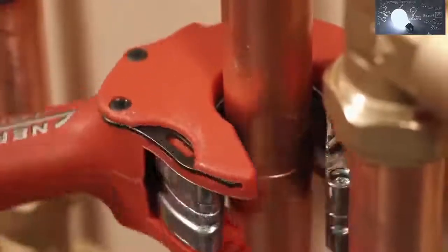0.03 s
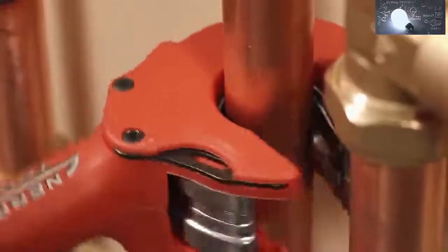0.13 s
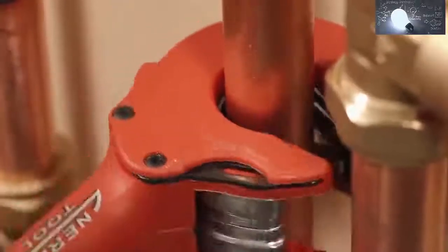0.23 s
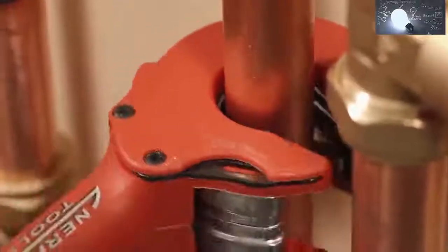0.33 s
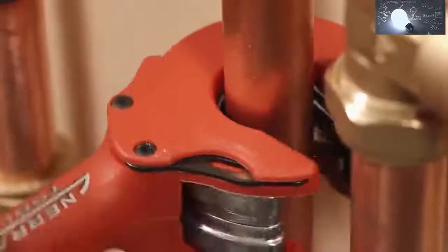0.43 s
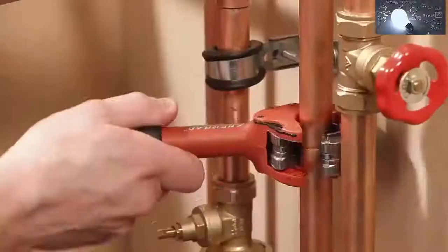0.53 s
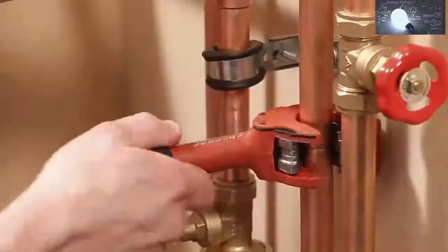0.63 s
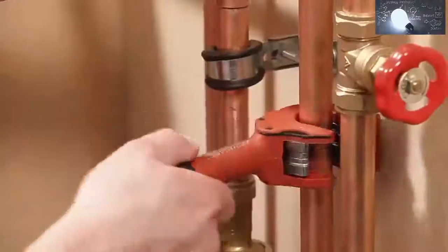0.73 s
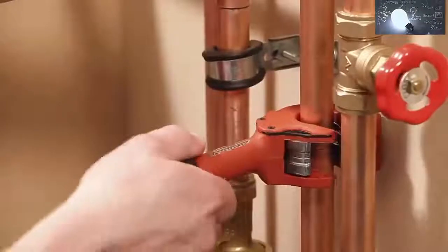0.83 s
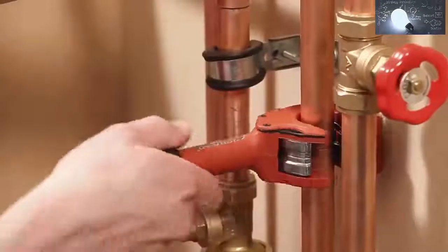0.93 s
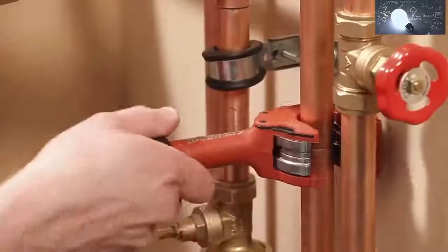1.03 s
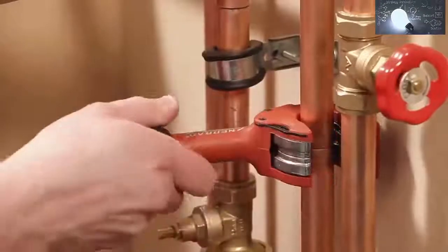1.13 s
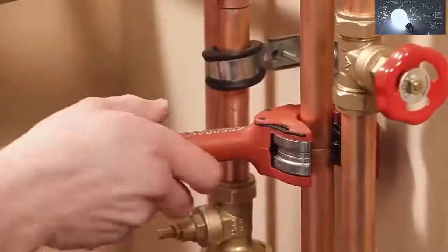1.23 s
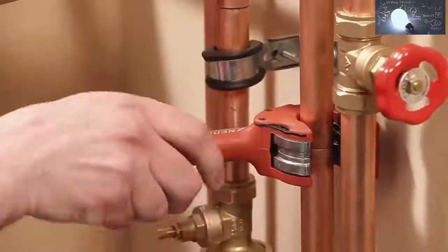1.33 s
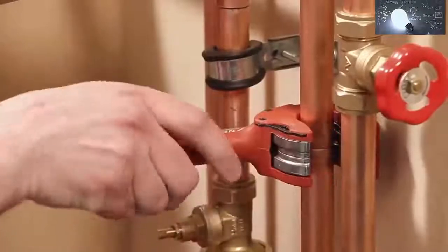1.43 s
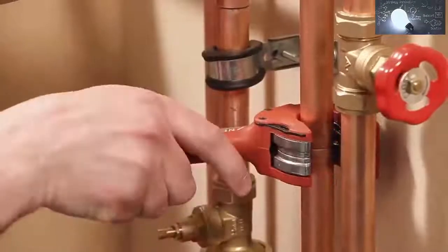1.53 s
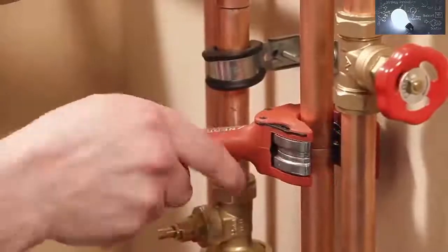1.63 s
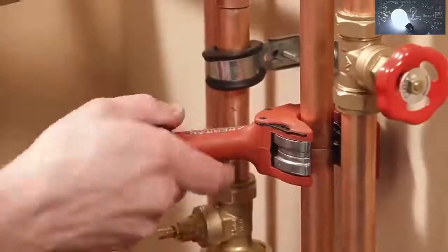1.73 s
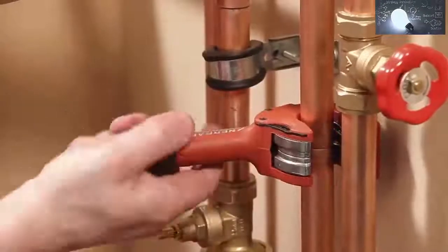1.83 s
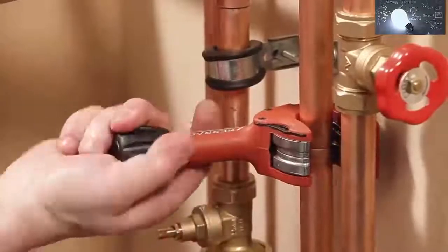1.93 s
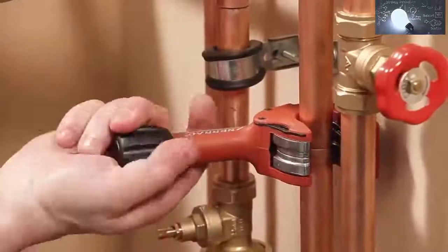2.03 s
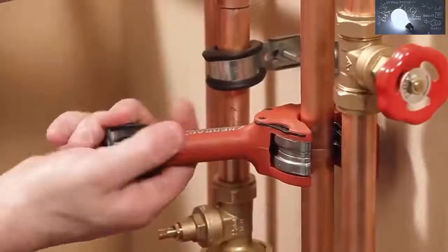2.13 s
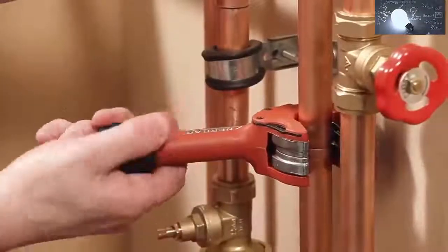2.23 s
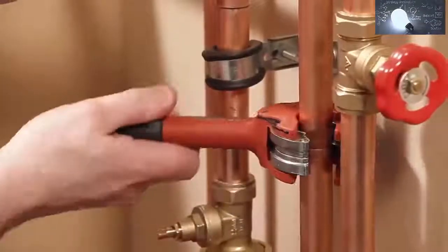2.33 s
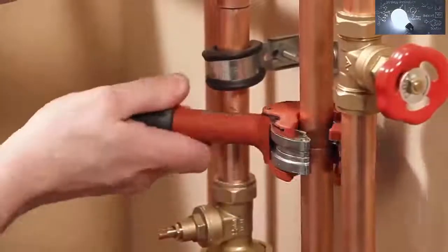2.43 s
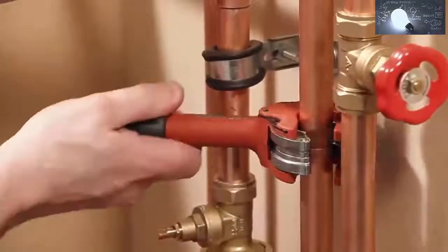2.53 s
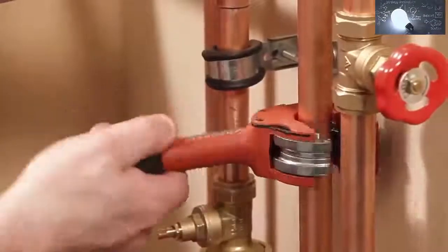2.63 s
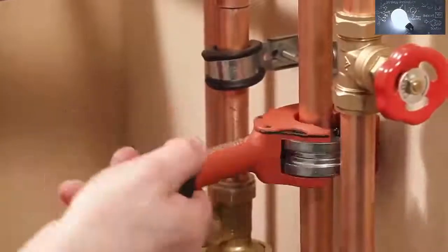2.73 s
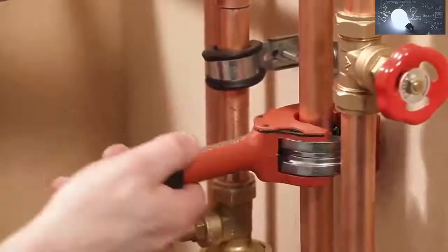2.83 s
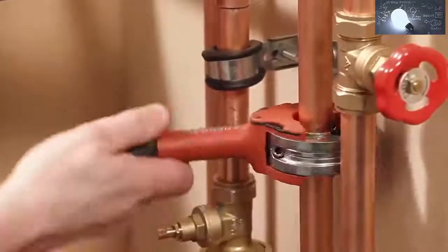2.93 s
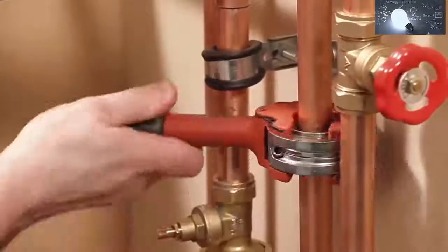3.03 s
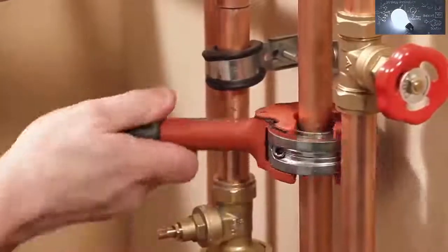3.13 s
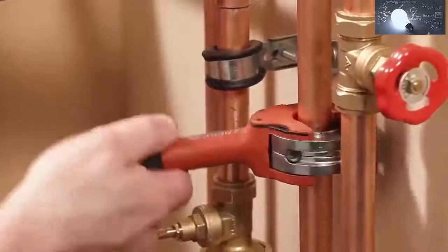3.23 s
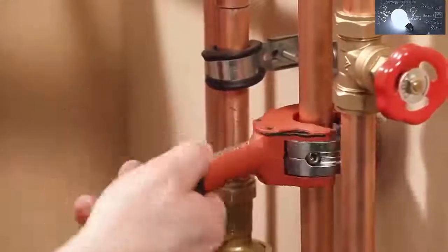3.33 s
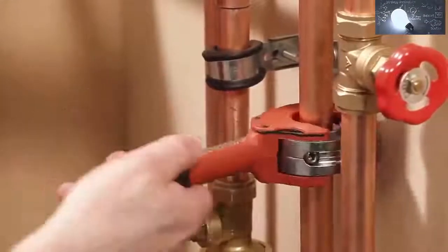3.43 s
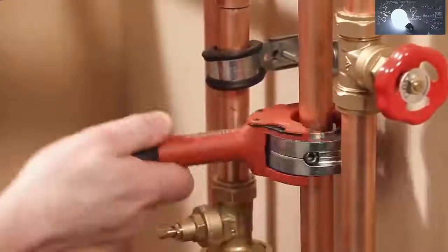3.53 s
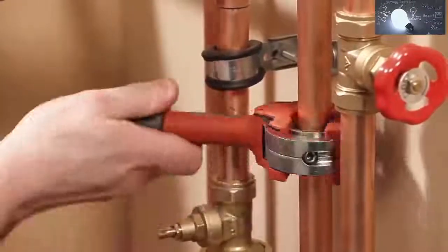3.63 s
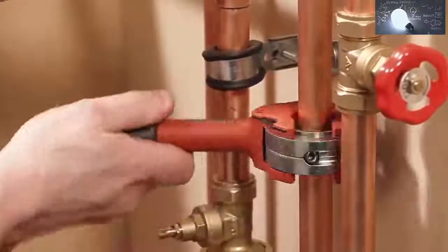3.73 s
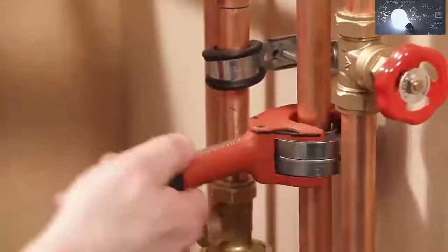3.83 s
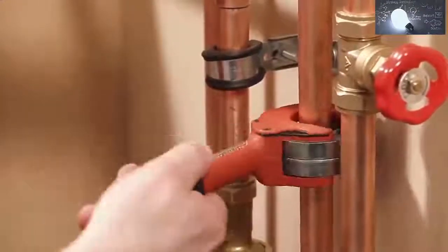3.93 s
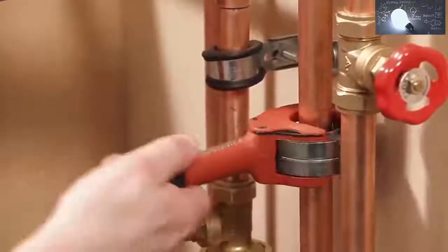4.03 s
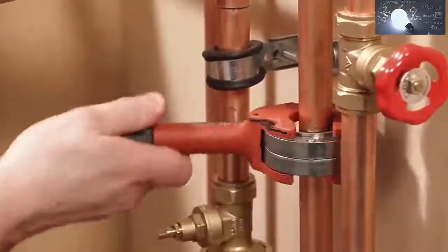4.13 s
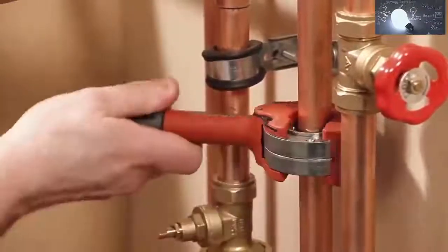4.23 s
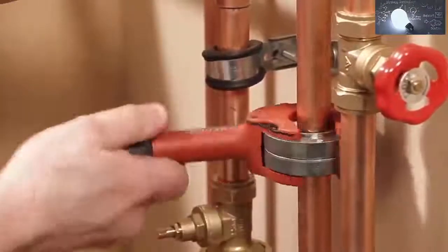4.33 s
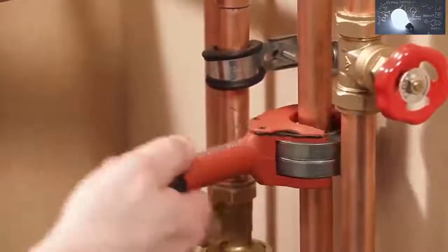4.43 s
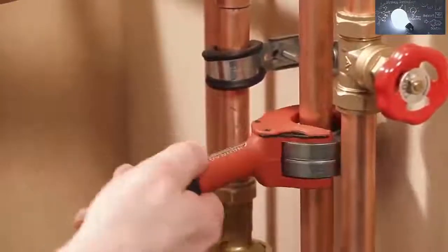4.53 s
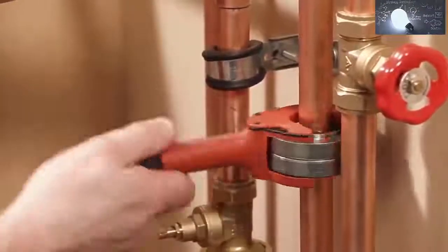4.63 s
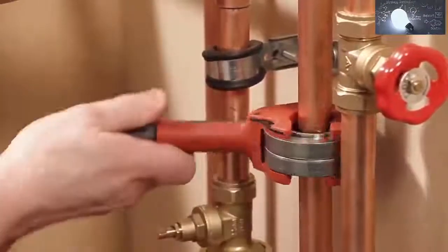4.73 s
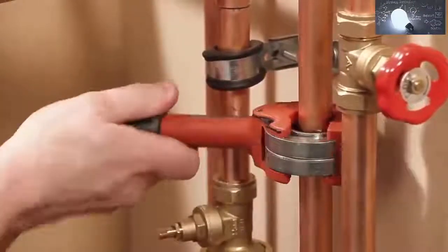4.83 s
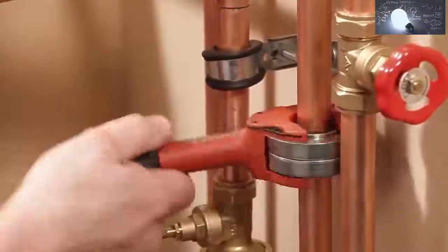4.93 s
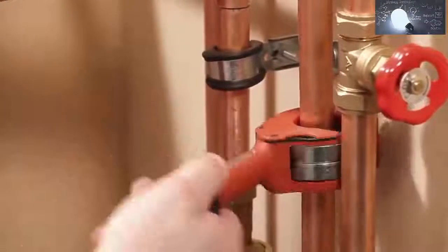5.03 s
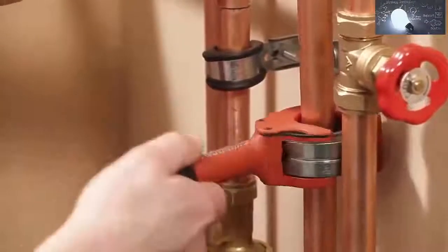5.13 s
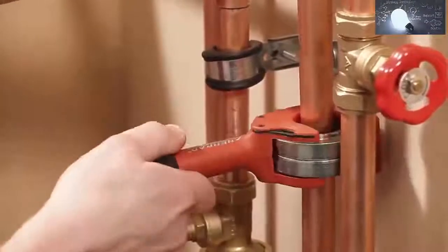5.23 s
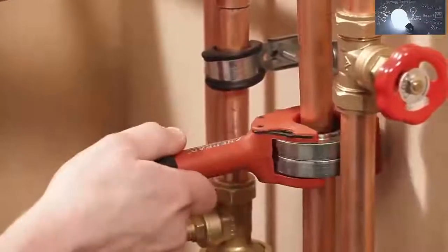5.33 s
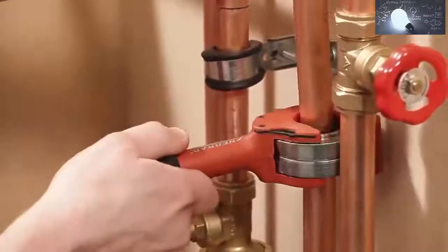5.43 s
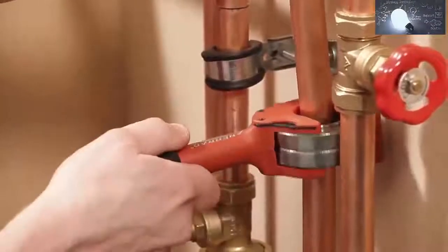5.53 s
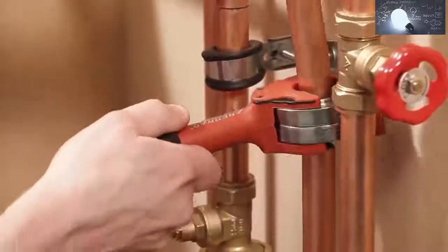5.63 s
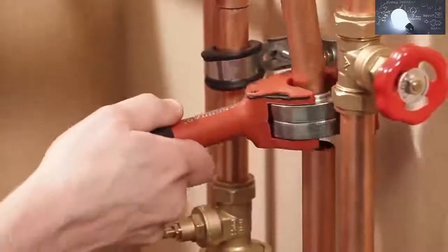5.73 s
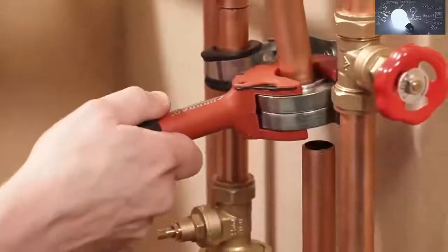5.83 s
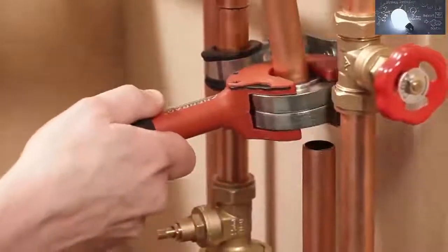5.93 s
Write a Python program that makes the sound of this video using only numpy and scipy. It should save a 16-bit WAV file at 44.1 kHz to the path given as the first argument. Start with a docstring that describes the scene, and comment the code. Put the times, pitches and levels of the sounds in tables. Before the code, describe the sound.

A hand ratchet tube cutter works on copper pipe in a bare, echoing room, heard close up over a very faint low hush. The tail of an earlier click opens the sound, with a soft tick at 0.1 s. Faint knocks from 0.36 s lead to a light, rapid cluster of clicks at 0.6-0.7 s. Firmer metallic clacks fall between 0.97 and 1.46 s, with a sharp knock at 1.19. Then it is almost quiet, with a faint rub near 1.8-2.0 s. Small grip knocks begin at 2.23, and strong ratchet bursts follow at 2.43-2.53, 3.0-3.19, 3.62-3.76, 4.2-4.32 and 4.78-4.89 s, bright, dry and uneven. Single handle knocks land between them around 3.87, 4.46, 4.7 and 5.02. A hard, crisp clack comes at 5.13 s, then the echo fades, with a light knock at 5.27 and small soft knocks at 5.55-5.8 s. Pipework booms very faintly beneath.

```python
"""In a bare, echoing room a ratchet tube cutter is fitted on a copper pipe and swung to and fro.
The pawl snaps over the teeth and the handle knocks at the stroke ends: bursts of noise strike
damped sine modes. Hand and rollers rub now and then, as level-shaped grains of coloured noise.
The pipework booms faintly, as noise through two low resonances, over a low hush of coloured noise."""
import sys
import numpy as np
from scipy import signal
from scipy.fft import rfft, irfft
from scipy.io import wavfile

SR = 44100
rng = np.random.default_rng(int(sys.argv[2]) if len(sys.argv) > 2 else 0)


def store_pcm(level_fs):
    """Save levels as 16-bit WAV."""
    pcm = np.round(np.clip(level_fs, -1, 1) * 32767).astype(np.int16)
    wavfile.write(sys.argv[1], SR, np.atleast_2d(pcm).T)


N = 264159
LEAD = SR // 4      # samples of sound made ahead of the start, so that its echo is already there
EARLIER_S = -0.1    # time of a blow ahead of the start, seconds


def blows():
    """A first touch and a few ms of chatter strike every mode; the part struck sets the balance."""
    # Modes of pipework, cutter body and pawl. Each row: pitch in Hz, level in dB, t60 in seconds.
    modes = [(207.6, -13, 0.047), (274, -11, 0.13), (327, -8, 0.056), (428.5, -1.5, 0.078),
             (529, -3, 0.049), (640.7, -4.5, 0.052), (944, 3, 0.02), (1104, -8, 0.081), (1155, -14, 0.15),
             (1279, 0.5, 0.049), (1435, -3.5, 0.072), (1497, 8, 0.0051), (1662, 6, 0.023), (1780, 0, 0.044),
             (1999, 1, 0.021), (2182, 1, 0.036), (2503, 7.5, 0.005), (2810, 1.5, 0.017),
             (3125, 13.5, 0.003), (3334, 8, 0.0072), (3436, -2.5, 0.029), (3797, 7.5, 0.0058),
             (4345, -3, 0.0048), (4610, 11.5, 0.00094), (5650, -7, 0.006), (5680, -0.5, 0.0019),
             (8660, -3, 0.00086), (9040, -18.5, 0.0012), (11500, -25, 0.00083), (13400, -32, 0.0018)]
    # Four parts: pipework, handle, head and pawl. Columns: loudness in dB for equal blows.
    part_levels = (1.5, -7.5, -7.5, 3.5)
    # Same four parts. Columns: energy of the first sharp touch in dB relative to the chatter.
    first_touch = (-11, -9, -3.5, -2)
    # Same four parts. Columns: chatter length factor; heavy parts shake longest, the pawl shortest.
    stretches = (4.57, 1.6, 1.01, 0.68)
    pipe_top_hz, handle_top_hz, pawl_bottom_hz = 800, 1900, 4500
    handle_hz, head_hz = 1313, 2740     # the handle's share of a body mode fades from one to the other
    pawl_share = 0.11                   # share of the pawl level per octave above head_hz
    favour_octaves = 0.09               # where a blow lands decides which modes ring most
    scatter_db = 2.0                    # chance spread of mode strengths from blow to blow
    detune = 0.018                      # grip and position put a blow's modes down, level or up

    s, head_db, handle_db, pipe_db, pawl_db, length_ms, favoured_hz, second_hz, favour_db = (
        np.transpose(all_blows()))
    favourites = np.array([favoured_hz, second_hz])
    contacts = [chatter(length_ms * stretch) for stretch in stretches]
    scatter = rng.standard_normal((len(s), len(modes)))
    signs = (-1) ** np.arange(len(modes))      # neighbouring modes swing against each other
    shifts = rng.integers(0, 3, len(s))
    at = LEAD + np.round(s * SR).astype(int)
    parts = np.zeros((len(part_levels), LEAD + N))

    for (hz, mode_db, t60), chance, sign in zip(modes, scatter.T, signs):
        part = (hz > pipe_top_hz) + (hz > handle_top_hz) + (hz > pawl_bottom_hz)
        handle_share = np.clip(np.log(head_hz / hz) / np.log(head_hz / handle_hz), 0, 1)
        body_db = handle_db * handle_share
        body_db += pawl_db * pawl_share * max(np.log2(hz / head_hz), 0)
        struck_db = (pipe_db, body_db, body_db, pawl_db)[part]
        distance = np.log2(hz / favourites) / favour_octaves
        lift_db = favour_db * np.exp(-np.square(distance)).max(axis=0)
        level_db = head_db + part_levels[part] + mode_db + struck_db + scatter_db * chance + lift_db
        size = sign * from_db(level_db)

        force = np.zeros((3, LEAD + N))     # one row for each tuning
        force[shifts, at] = size * from_db(first_touch[part])
        for shift, start, gain, burst in zip(shifts, at, size, contacts[part]):
            force[shift, start:start + len(burst)] += gain * burst
        parts[part] += sum(ring(force[k], hz * (1 + detune * (k - 1)), t60) for k in range(3))

    # small parts radiate no bass, soft contacts no treble
    pipework = band(parts[0], 170, 880)
    body = band(parts[1] + parts[2], 533, 5300)
    pawl = band(parts[3], 3200, 12600)
    return pipework + body + pawl


def all_blows():
    """Rows of every blow: pawl snaps, their rebounds, handle knocks; columns as for the earlier blow."""
    # The pawl snaps over a tooth. Each row: start in seconds, head strength in dB,
    # pawl level in dB relative to the head, favoured mode in Hz, chatter in ms before stretching.
    snap_rows = [(0.0924, -31.5, -15.5, 2680, 1.36), (0.4407, -41.5, -16, 4260, 0.79),
                 (0.479, -50.5, -0.5, 6370, 1.1), (0.518, -43, -3, 7740, 0.77),
                 (0.579, -36.5, -5, 3330, 1.3), (0.6101, -32, -2, 8000, .7), (0.6278, -34.5, -5, 6000, 0.4),
                 (0.6756, -32.5, -9, 4340, 1), (0.6899, -36, -1.5, 6100, 0.5),
                 (1.0849, -26.5, -6.5, 2170, 2), (1.139, -27.5, -8, 2200, 2.3),
                 (1.1428, -28, -20, 2190, 0.91), (1.1567, -25.5, -8, 3550, 1.5),
                 (1.255, -39, -2.5, 3775, 3), (1.2774, -27.5, -15, 2350, 3),
                 (1.3365, -25.5, -8.5, 3700, 1.2), (1.461, -33, -10, 3800, 1.17),
                 (2.0213, -49.5, -14, 3775, 1.9), (2.4296, -25, -14.5, 2460, 3.8),
                 (2.4411, -25, -6, 3600, 1.43), (2.4915, -22.5, -8.5, 3775, 2.1),
                 (2.531, -21, -22, 2600, 4.8), (3.001, -22, -8.5, 4300, 2.1),
                 (3.0393, -19.5, -12, 3800, 0.97), (3.07, -24, -12, 2350, 1),
                 (3.1002, -24.5, -11, 2370, 1.2), (3.135, -25.5, -11, 3300, 0.72),
                 (3.185, -23.5, -9.5, 6300, 1.76), (3.6177, -21.5, -6.5, 3775, 3.3),
                 (3.625, -20, -8.5, 3240, 1.34), (3.6555, -23.5, -7.5, 3640, 2.6),
                 (3.687, -24.5, -9.5, 3550, 4), (3.757, -29, -8.5, 3700, 5.5),
                 (4.2012, -19, -9.5, 2470, 2.16), (4.2306, -21, -10.5, 2400, 1.7),
                 (4.319, -23.5, -12.5, 3800, 4), (4.7777, -18, -11, 3930, 2.1),
                 (4.804, -21, -11.5, 2180, 2.7), (4.8307, -25.5, -8, 2400, 2.6),
                 (4.8596, -27, -7, 3700, 2.1), (4.894, -23.5, -12.5, 2100, 1.04),
                 (5.1256, -19, -7.5, 13200, 1)]
    # The handle knocks, takes up slack or is gripped. Each row: start in seconds, head strength in dB,
    # handle and pipework in dB relative to the head, two favoured modes in Hz,
    # chatter in ms before stretching.
    knock_rows = [(0.3602, -44.5, 9.5, 1, 284, 607, 2.37), (0.45, -49, -1, -22, 1670, 1400, 1.3),
                  (0.638, -36, -13, -24, 1370, 1670, 2.3), (0.7, -47.5, 3, -11, 1660, 2000, 2.6),
                  (0.9704, -29.5, -11.5, -30, 1310, 2000, 4.1), (1.1903, -29, -10, -21, 2460, 3180, 1.2),
                  (1.1927, -17, -11.5, -23, 1703, 2800, 1.2), (1.4530, -33.5, -1.5, -13, 1120, 630, 0.98),
                  (2.231, -45, -21, -13.5, 2530, 2000, 2.8), (2.267, -36.5, -11, -24, 2630, 3250, 4.4),
                  (2.293, -38.5, 2, -7, 1270, 996, 2.25), (2.3131, -33.5, -7, -17, 2800, 3220, 2.1),
                  (2.499, -44.5, 10.5, -5, 1120, 1210, 1.4), (2.542, -59.5, -6, 14.5, 308, 323, 2.3),
                  (2.9544, -45, -1.5, -13, 2720, 2180, 3.2), (2.988, -36, -1, -12.5, 3430, 1272, 4.6),
                  (3.2629, -36.5, -5, -11, 3140, 2500, 1.66), (3.5407, -34, -10.5, -27, 1800, 2710, 3),
                  (3.574, -37.5, -11, -10, 1800, 2230, 4.2), (3.8676, -23, -14.5, -21.5, 1910, 1660, 3.07),
                  (4.124, -40, -1, -17.5, 1750, 2740, 3), (4.4542, -38.5, -8, -22, 1760, 2580, 2.3),
                  (4.4592, -21.5, -9, -23, 1770, 1114, 1.9), (4.7008, -27.5, -11, -23.5, 1250, 3246, 3.3),
                  (5.017, -24.5, -7.5, -19.5, 2053, 1150, 2.7), (5.1298, -17, -12, -21, 2923, 1710, 1.07),
                  (5.2659, -30.5, -29, -39, 2750, 2800, 2.2), (5.55, -53, -2.5, -9, 1910, 3220, 2.3),
                  (5.6216, -56.5, 2, -5, 2010, 2160, 3.9), (5.662, -44.5, -1, -15, 1280, 1280, 5.1),
                  (5.7286, -33.5, -10.5, -26, 1690, 1425, 1.9), (5.791, -29, -2.5, -11, 2450, 1170, 2.23)]
    # A blow ahead of the start, of which little but the echo is heard. The row: start in seconds,
    # head strength in dB, handle, pipework and pawl in dB relative to the head,
    # chatter in ms before stretching, two favoured modes in Hz, their lift in dB.
    earlier = (EARLIER_S, -25, -6, -13, -3.5, 2.3, 13000, 1707, 4.1)
    # a stronger snap shakes handle and pipework more too, though by a little less than the head
    snap_handle_db, snap_pipe_db, body_slope, mean_db = -21, -29.5, -0.23, -19
    snap_favour_db, knock_favour_db, knock_pawl_db = 5, 7, -23
    rebound_ms, rebound_db = (6, 20), -14   # the pawl bounces twice at chance moments after a snap

    snaps = []
    for s, db, pawl_db, hz, ms in snap_rows:
        lean_db = body_slope * (db - mean_db)
        snaps.append((s, db, snap_handle_db + lean_db, snap_pipe_db + lean_db,
                      pawl_db, ms, hz, hz, snap_favour_db))
    knocks = [(s, db, handle_db, pipe_db, knock_pawl_db, ms, hz, second_hz, knock_favour_db)
              for s, db, handle_db, pipe_db, hz, second_hz, ms in knock_rows]
    delays = rng.uniform(*rebound_ms, (len(snaps), 2)) / 1000
    rebounds = [(s + lag, db + rebound_db, *rest)
                for (s, db, *rest), lags in zip(snaps, delays) for lag in lags]
    return [earlier] + snaps + knocks + rebounds


def chatter(length_ms):
    """Parts rattle in contact: a noise burst a blow swells, dies and favours no pitch; energy 1."""
    t = np.arange(SR // 12) / SR / (np.clip(length_ms, 0.3, 15)[:, None] / 1000)   # in burst lengths
    envelope = np.sqrt(t) * np.exp(-t)
    burst = rng.standard_normal(t.shape)
    for _ in range(4):      # shape in time and flatten in frequency by turns
        spread = burst[:, :100].std(axis=1, keepdims=True)
        shaped = np.tanh(burst / spread / 2) * envelope
        flat = irfft(np.exp(1j * np.angle(rfft(shaped))), t.shape[1])
        burst = flat / (envelope + 0.02)
    burst = burst * envelope
    return burst / np.sqrt(np.sum(burst ** 2, axis=1, keepdims=True))


def rubbing():
    """Hand and rollers stick and slip in dense uneven grains under the level of each stroke."""
    # Strokes of rubbing. Each row: start in seconds, length in seconds, level in dB.
    strokes = [(0.427, 0.16, -62), (1.809, 0.19, -64.5), (2.271, 0.034, -53), (3.581, 0.13, -46),
               (4.201, 0.016, -44.5), (5.665, 0.021, -52.5)]
    # Tone of the rubbing. Each row: frequency in Hz, spectrum in dB per Hz.
    tone = [(180, -33), (300, -13), (1220, -7.5), (1380, -1.5), (1740, 2), (2340, 5), (3830, -4),
            (5060, -10), (12000, -44), (15600, -79), (22000, -120)]
    grains_per_s, attack_db_per_s, release_db_per_s = 4300, 310, 412
    t = (np.arange(LEAD + N) - LEAD) / SR
    slips = rng.random(len(t)) < grains_per_s / SR
    unevenness = from_db(2.96 * rng.exponential(1, len(t)))
    grains = slips * rng.standard_normal(len(t)) * unevenness
    level = sum(swell(t, *stroke, attack_db_per_s, release_db_per_s) for stroke in strokes)
    return level * colour(grains, tone)


def room(x):
    """Direct sound plus an echo that blends steadily through four patterns, so no one colour stays."""
    turn_s = 0.31       # time from one pattern to the next
    turn = np.arange(len(x)) / SR / turn_s
    wet = 0
    for k in range(4):
        away = np.abs((turn - k + 2) % 4 - 2)       # turns away from this pattern
        share = np.cos(np.pi / 2 * np.minimum(away, 1))     # even power in sum
        wet = wet + signal.fftconvolve(x * share, echo())
    return x[LEAD:] + wet[LEAD:LEAD + N]


def echo():
    """One pattern of close wall reflections and of noise that builds up and dies band by band."""
    # Echo of the room. Each row: frequency in Hz, t60 in seconds, level in dB relative to direct energy.
    echo_bands = [(92, 0.81, -2.5), (278, 0.86, 2), (790, 0.88, 2.5), (2090, 0.64, -4.5), (3970, 0.64, 0),
                  (6600, 0.49, -2.5), (12400, 0.26, -5)]
    wall_last_s, wall_db, wall_delay_s = 0.015, -2, 0.002   # close cluster off the wall behind the pipes
    t = np.arange(SR) / SR
    wall = rng.standard_normal(SR) * np.exp(-(t / wall_last_s) ** 4) * (t > wall_delay_s)
    response = from_db(wall_db) * wall / np.sqrt(np.sum(wall ** 2))
    white = rng.standard_normal((2, SR))        # neighbouring bands take different noise
    edges = 50 * 2 ** np.arange(0, 8.6, 0.5)    # half octaves, Hz
    for k, (low, high) in enumerate(zip(edges, edges[1:])):
        hz = np.sqrt(low * high)
        build_up = 1 - np.exp(-t / wall_last_s)
        shape = from_db(-60 * t / at_hz(echo_bands, hz)) * build_up
        band_pass = signal.butter(2, [low, high], "band", fs=SR, output="sos")
        noise = signal.sosfilt(band_pass, white[k % 2])
        gain = from_db(at_hz(echo_bands, hz, axis=2))
        response += gain * noise * shape / np.sqrt(np.sum(shape ** 2))
    return response


def hum():
    """Noise through the lowest modes of the pipework, swelling with each jolt."""
    # Low modes of the pipework. Each row: pitch in Hz, width in Hz, level in dB relative to each other.
    low_modes = [(135.8, 6.9, -1.5), (156.7, 6.6, 4)]
    # Jolts to the pipework. Each row: time of the peak in seconds, level in dB.
    jolts = [(0.12, -63), (0.4, -61), (0.75, -72), (1.251, -67.5), (1.53, -62), (2.37, -68), (2.65, -56.5),
             (3.05, -65), (3.29, -60), (3.74, -56.5), (3.93, -60.5), (4.22, -66), (4.518, -64),
             (4.85, -56.5), (5.188, -53.5), (5.84, -60), (5.918, -64)]
    rise_db_per_s, fall_db_per_s, rest_db = 209, 87.5, -76.5
    rings = 0
    for hz, width, db in low_modes:
        t60 = np.log(1000) / np.pi / width
        rings = rings + from_db(db) * rms_one(ring(rng.standard_normal(N), hz, t60))
    t = np.arange(N) / SR
    level = sum(swell(t, s, 0, db, rise_db_per_s, fall_db_per_s) for s, db in jolts)
    return (from_db(rest_db) + level) * rms_one(band(rings, 31, 440))


def hush():
    """The low hush of the room: steady noise shaped by a spectrum."""
    # Tone of the hush. Each row: frequency in Hz, spectrum in dB per Hz.
    tone = [(12, -61), (20, -21), (147, 10), (357, -1.5), (525, 9), (774, -6), (940, 6), (2690, -7),
            (3760, -3), (11400, -22), (15000, -38)]
    level_db = -69
    return from_db(level_db) * colour(rng.standard_normal(N), tone)


def ring(clicks, hz, t60):
    """A damped resonator: a unit click sets a sine of height 1 ringing."""
    r, w = from_db(-60 / (t60 * SR)), 2 * np.pi * hz / SR
    return signal.lfilter([0, np.sin(w)], [1, -2 * r * np.cos(w), r * r], clicks + 1e-18)


def swell(t, start, length, db, rise_db_per_s, fall_db_per_s):
    """Gain that rises to a level, holds and falls, in straight lines of dB."""
    rise_db = rise_db_per_s * np.maximum(start - t, 0)
    fall_db = fall_db_per_s * np.maximum(t - start - length, 0)
    return from_db(db - rise_db - fall_db)


def colour(x, spectrum):
    """Shapes a signal by a (Hz, dB) spectrum; rms 1."""
    hz = np.maximum(np.fft.rfftfreq(len(x), 1 / SR), 1)
    return rms_one(irfft(rfft(x) * from_db(at_hz(spectrum, hz)), len(x)))


def band(x, low_hz, high_hz):
    """Steep band-pass."""
    return signal.sosfilt(signal.butter(3, [low_hz, high_hz], "band", fs=SR, output="sos"), x)


def at_hz(points, hz, axis=1):
    """Reads a table column on a log-frequency axis."""
    points = np.array(points)
    return np.interp(np.log(hz), np.log(points[:, 0]), points[:, axis])


def rms_one(x):
    """Scales to rms 1."""
    return x / np.sqrt(np.mean(x ** 2) + 1e-20)


def from_db(db):
    """dB to gain."""
    return 10 ** (np.asarray(db) / 20)


def scene():
    """Blows and rubbing in the room, over the hum and the hush."""
    in_room = room(blows() + rubbing())
    return (in_room + hum() + hush())[None]


def record(dry):
    """A steep low-pass cuts the top."""
    cutoff_hz = 15569
    return signal.sosfilt(signal.cheby2(12, 70, cutoff_hz, fs=SR, output="sos"), dry)


dry = scene()
out = record(dry)
store_pcm(out)
```